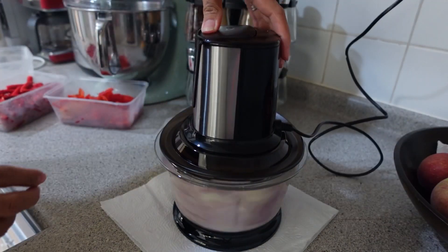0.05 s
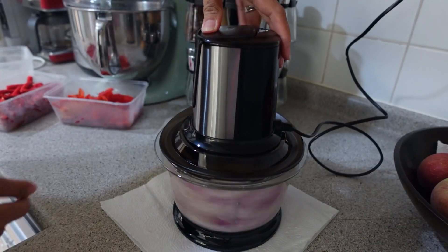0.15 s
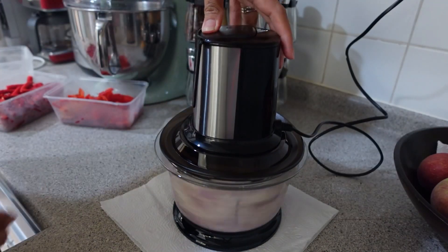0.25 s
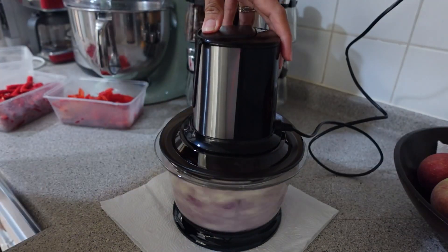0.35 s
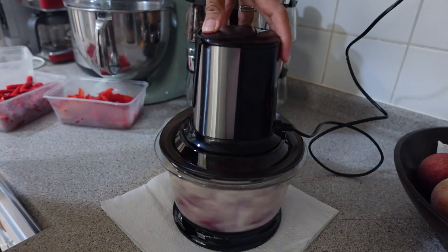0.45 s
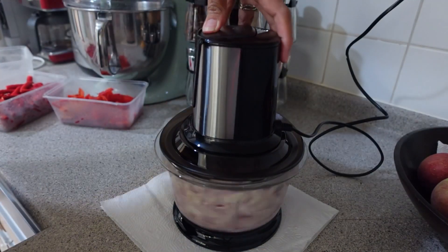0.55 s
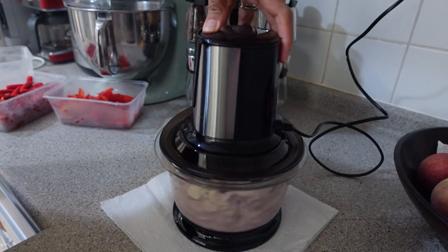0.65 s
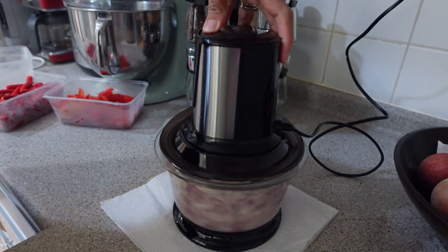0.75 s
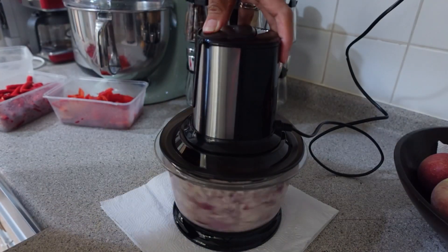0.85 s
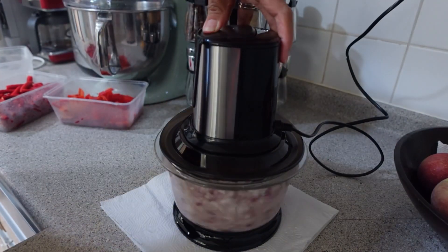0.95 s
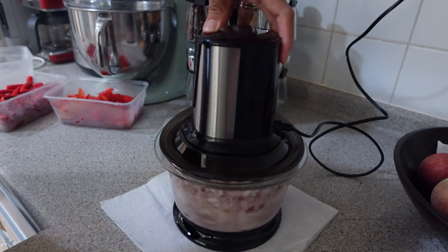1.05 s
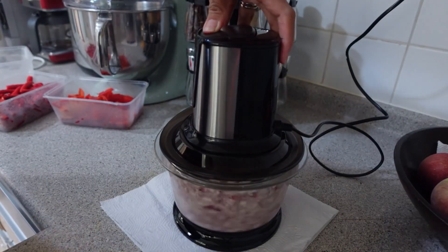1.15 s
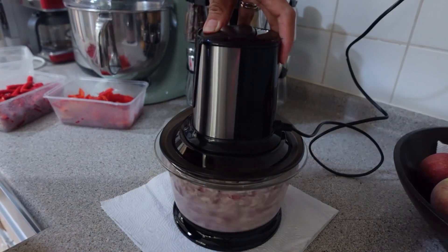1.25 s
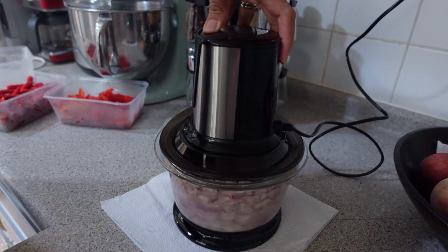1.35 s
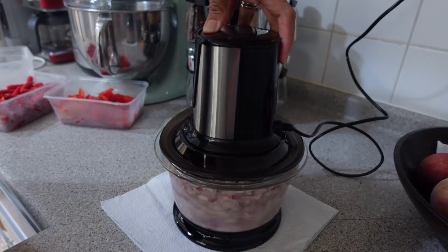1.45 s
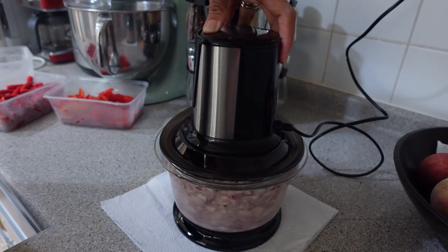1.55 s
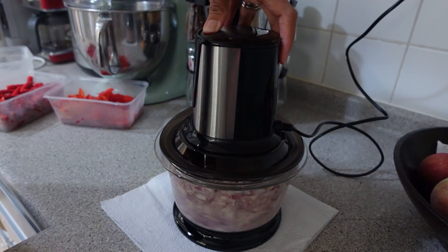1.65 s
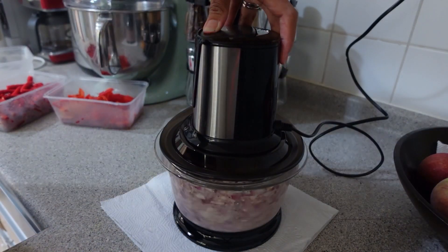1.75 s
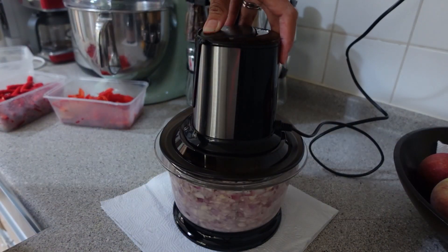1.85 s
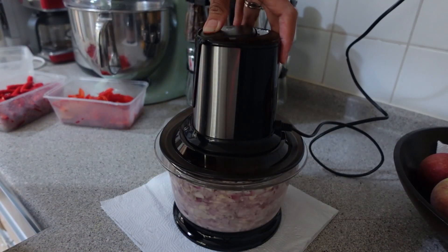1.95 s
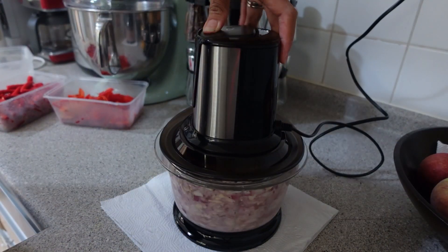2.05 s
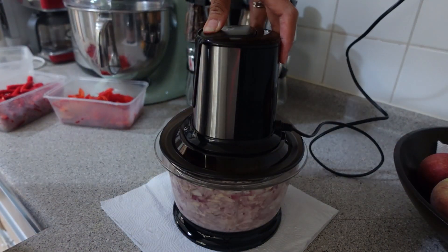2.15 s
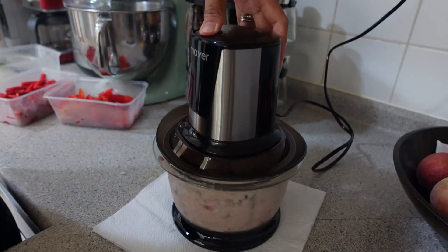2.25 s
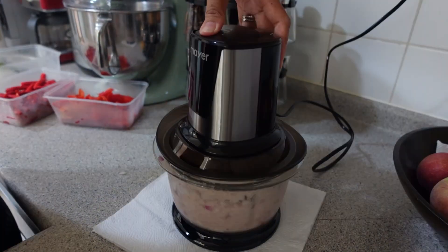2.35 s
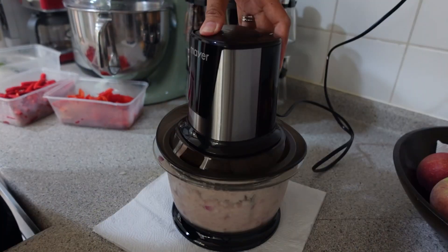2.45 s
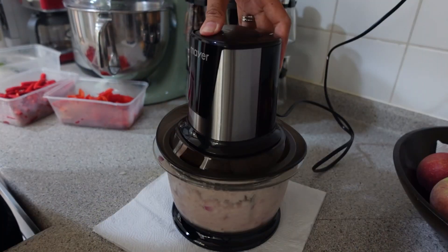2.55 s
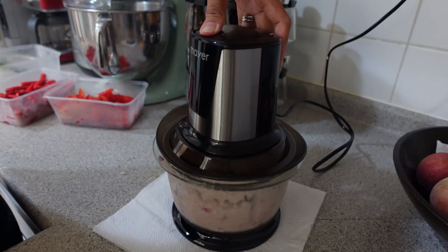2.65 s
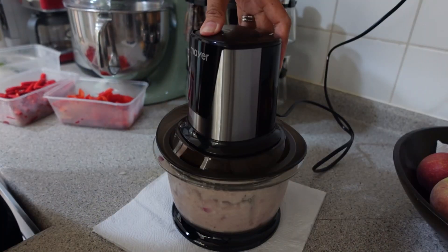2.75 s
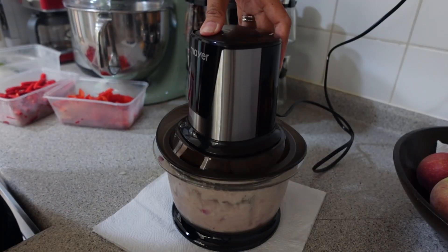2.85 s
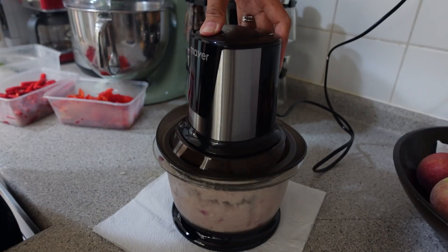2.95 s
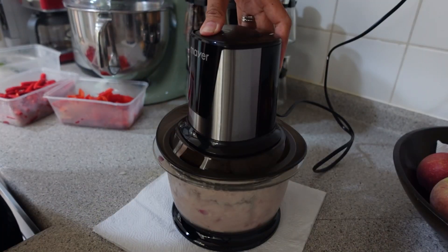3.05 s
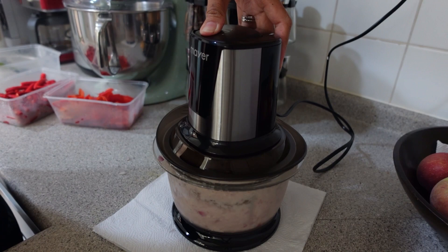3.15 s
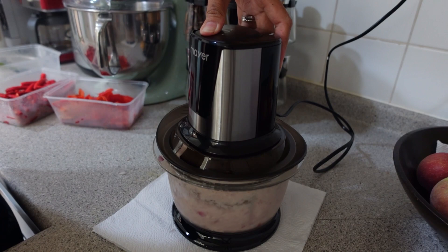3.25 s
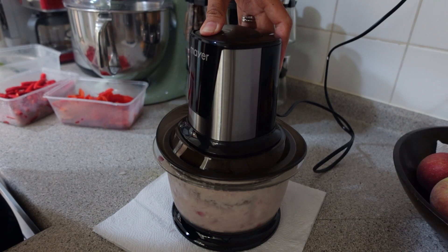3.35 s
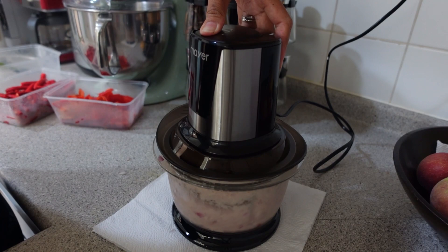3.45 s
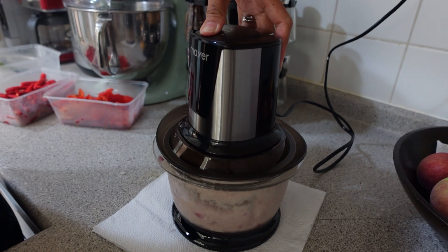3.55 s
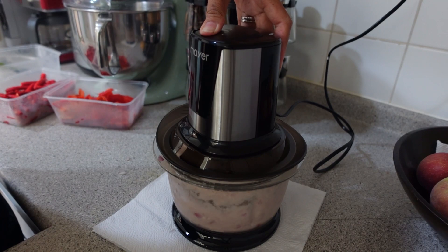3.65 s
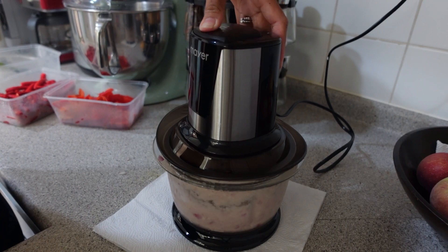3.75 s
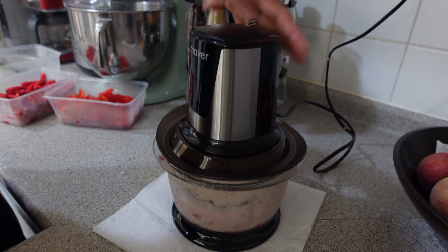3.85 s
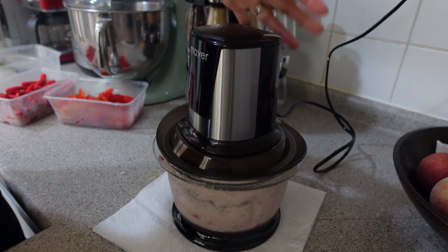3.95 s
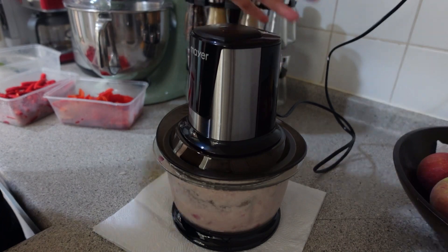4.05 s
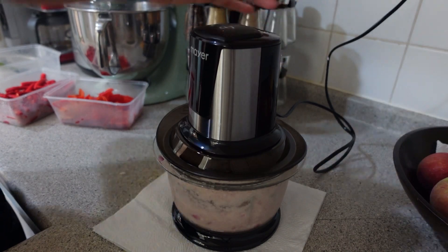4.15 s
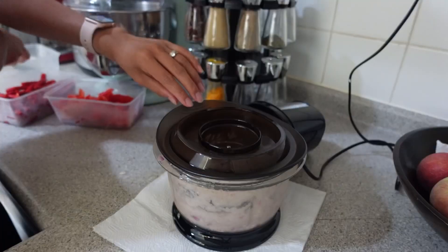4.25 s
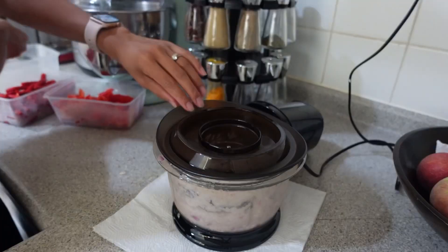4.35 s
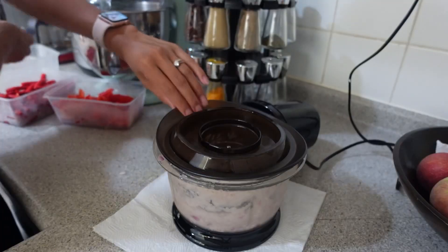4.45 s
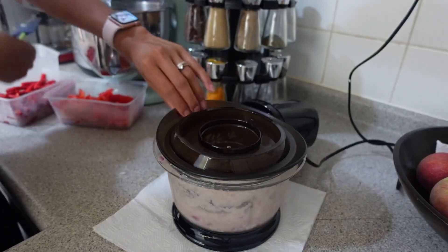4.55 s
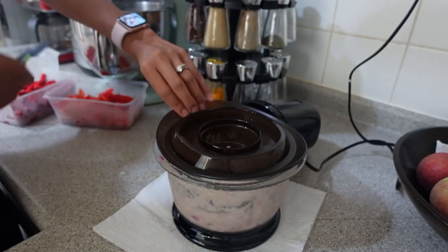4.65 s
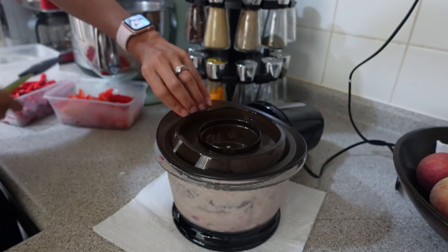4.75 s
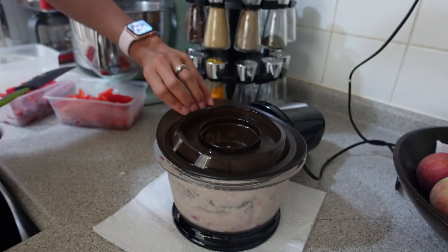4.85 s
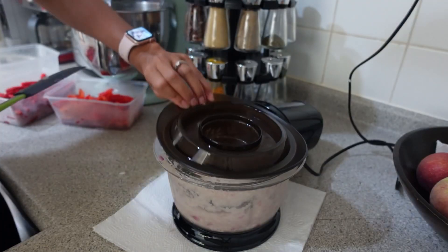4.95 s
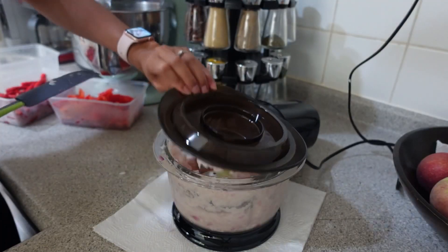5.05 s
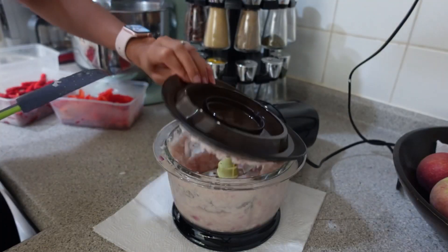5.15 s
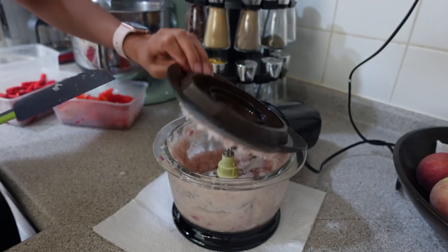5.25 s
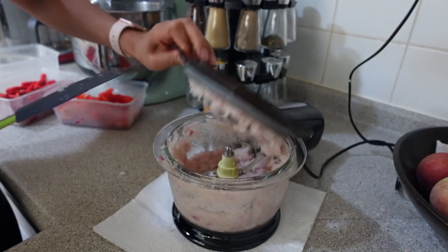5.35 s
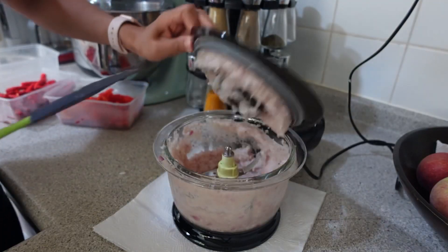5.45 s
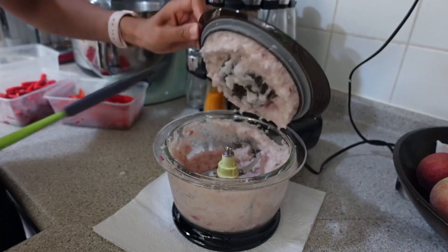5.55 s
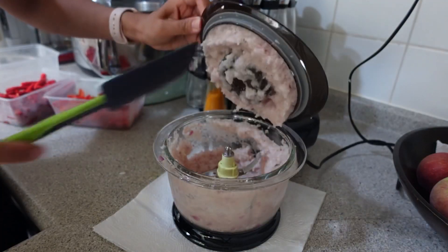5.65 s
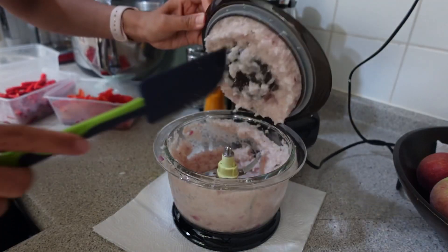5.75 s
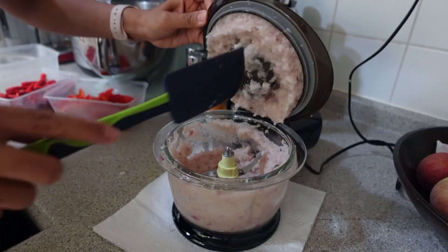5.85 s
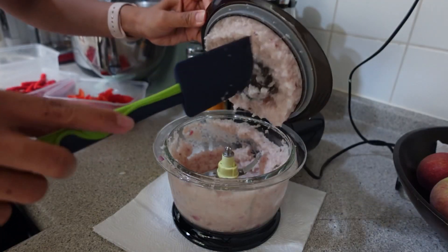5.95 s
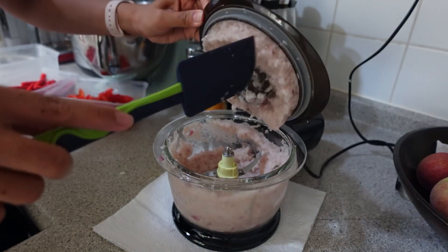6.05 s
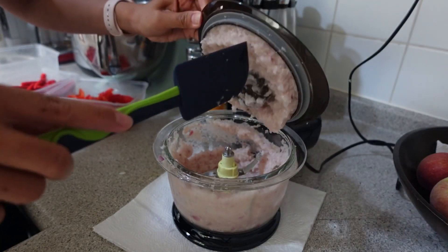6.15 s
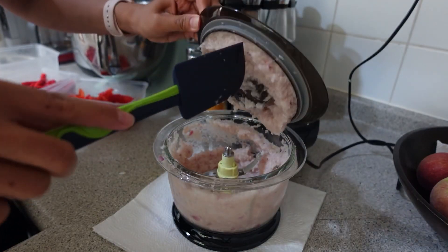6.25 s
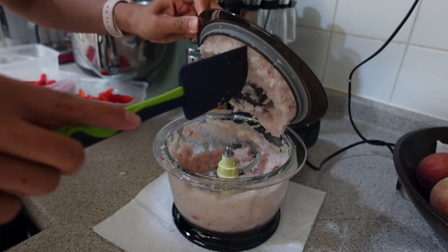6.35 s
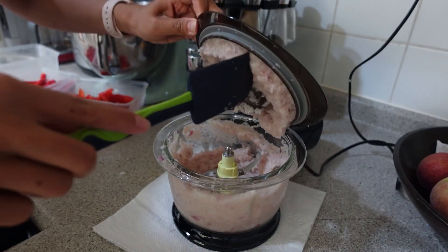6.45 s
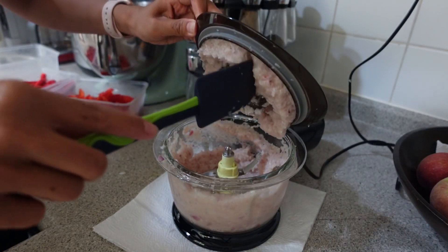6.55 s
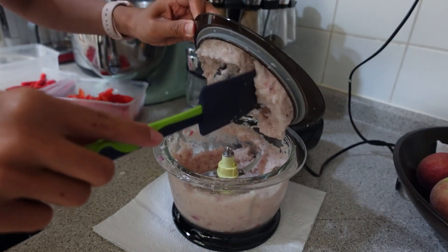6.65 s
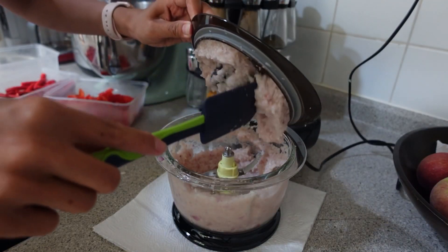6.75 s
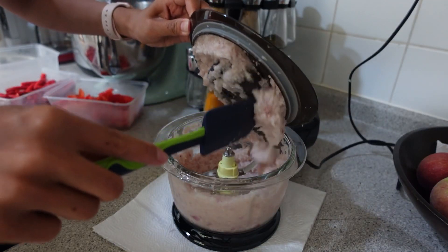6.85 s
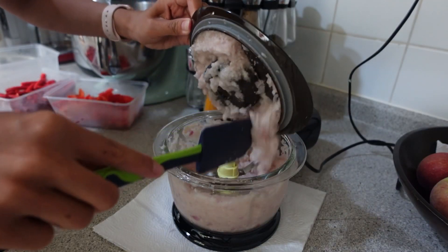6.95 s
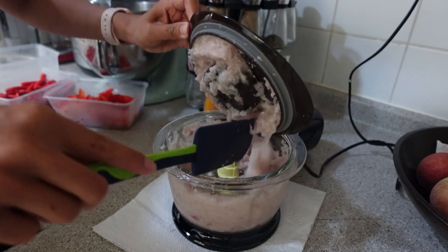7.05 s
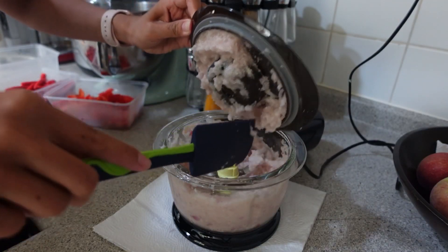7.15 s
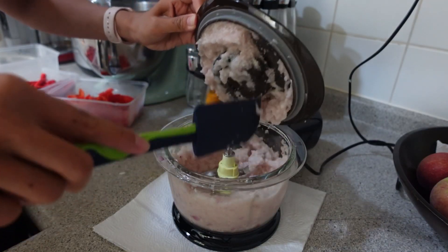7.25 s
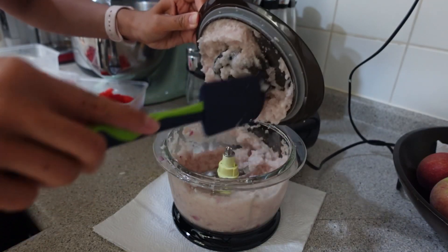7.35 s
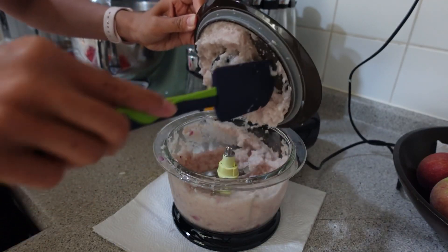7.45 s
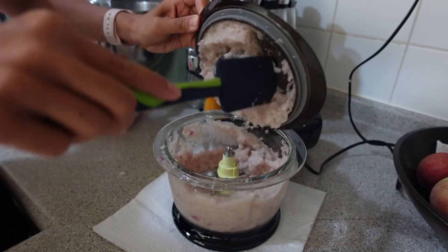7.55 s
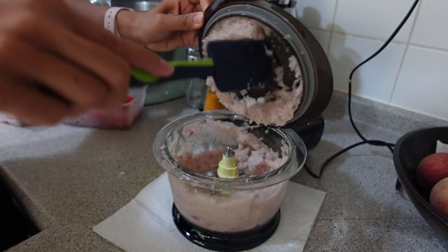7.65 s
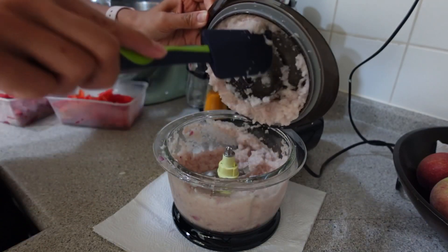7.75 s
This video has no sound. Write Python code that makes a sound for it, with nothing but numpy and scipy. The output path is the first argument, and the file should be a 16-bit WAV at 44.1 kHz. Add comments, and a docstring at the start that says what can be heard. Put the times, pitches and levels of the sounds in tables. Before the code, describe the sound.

A mini food chopper roars and churns, then stops, followed by light plastic lid and spatula knocks in a quiet kitchen.

```python
"""Mini chopper grinding onions

Blades roar in a glass bowl, and the gear whine climbs as the pieces shrink and the load falls.
After a brief dip in level the chopper churns pulp, then coasts down. After a second dip the
plastic lid is lifted and scraped with a spatula, each knock exciting its damped modes.
Behind it lie kitchen room tone and a high shrill band, likely insects outside."""
import sys
import numpy as np
from scipy import signal
from scipy.io import wavfile
from scipy.ndimage import uniform_filter1d

SR = 44100
rng = np.random.default_rng(int(sys.argv[2]) if len(sys.argv) > 2 else 0)


def digitize_waveform(pressure):
    """Quantize a signal to 16-bit integers and store it at the path in sys.argv[1].

    Rows of a 2-D input are taken as channels; values are limited to [-1, 1].
    """
    field = np.atleast_2d(pressure).T
    bounded = np.clip(field, -1, 1)
    quanta = np.round(bounded * 32767).astype(np.int16)
    wavfile.write(sys.argv[1], SR, quanta)


N = 343980
TIME = np.arange(N) / SR
CHURN_S, POWER_OFF_S, STOP_S = 2.2652, 3.73, 4.2315

# course of the roar: t/s, level/dB, rumble offset/dB, water and blade fizz offset/dB
ROAR_LEVELS = [(0, -12, -11, -12.5), (0.898, -13.5, -12.5, -10), (1.6, -13.5, -16.5, -8.5),
               (2.26, -13.5, -13, -5), (2.269, -12.5, -11.5, -4), (3.701, -12, -12, -4.5),
               (4, -12, -15, -4), (4.1, -16.5, -17.5, -3.5), (4.23, -21, -14, -7)]
# roar spectra for chopping, churning and coasting, each: f/Hz, density/dB
ROAR_SPECTRA = [
    [(35, -36.5), (90, -15.5), (190, -4), (260, -16), (400, -15), (700, -15.5), (920, -17), (1000, -11),
     (1350, -8), (1800, -10.5), (2250, -9), (2750, -15.5), (3500, -14.5), (6800, -23), (12400, -35),
     (15600, -37)],
    [(35, -32), (90, -20), (190, -5.5), (260, -16.5), (450, -15.5), (900, -3.5), (1000, -2.5), (1600, -2.5),
     (2250, -2), (2750, -5.5), (3400, -8.5), (5300, -5.5), (6400, -11.5), (8300, -13.5), (12000, -23.5),
     (15600, -26)],
    [(24, -68), (40, -49), (96, -4), (407, -11), (592, -9), (654, -10), (905, -10), (1650, -9.5),
     (2710, -11.5), (3000, -13.5), (4360, -1.5), (7360, -5), (15600, -22.5)],
]
# peaks and notches of housing, lid and bowl in those stages: f/Hz, width/Hz, gain/dB
CHOP_RESONANCES = [(600, 60, 4), (810, 60, 5), (1175, 50, 5), (1740, 50, -5), (1950, 90, 4), (2283, 90, 5),
                   (3700, 100, -3), (3973, 150, 5), (4600, 120, -4), (8398, 90, 8), (8700, 250, -4),
                   (9410, 150, 5), (10411, 130, 6), (11423, 100, 6)]
CHURN_RESONANCES = [(586, 30, 5), (1020, 80, 6), (1175, 50, 4), (1680, 50, 5), (1906, 45, 5),
                    (2200, 120, 4), (2750, 60, -5), (2955, 45, 13), (3125, 40, 7), (3240, 50, -5),
                    (3350, 45, 7), (3950, 130, 6), (4550, 60, -5), (5160, 80, 5), (5448, 55, 10),
                    (7000, 35, 10), (7397, 50, 7), (7763, 80, 6), (8301, 60, 9), (9173, 60, 4),
                    (9500, 120, 5), (10476, 80, 5), (10874, 90, 6), (11550, 100, 8)]
COAST_RESONANCES = [(592, 40, 10), (1163, 54, 7), (1475, 50, 9), (1626, 90, 12), (2050, 120, 7),
                    (3025, 120, 10), (3370, 84, 6), (3984, 150, 5), (4727, 110, 7), (5157, 54, 5),
                    (5652, 93, 6), (7203, 99, 5), (7763, 150, 6)]
# tooth-meeting rate, rising in steps as the load falls: t/s, f/Hz
MESH_RATE = [(0, 1170), (.18, 1305), (.42, 1320), (.55, 1372), (.78, 1388), (1, 1442), (1.28, 1515),
             (1.6, 1512), (1.76, 1582), (1.95, 1575), (2.08, 1640), (2.27, 1715)]
# mesh harmonics: multiple, rasp width/Hz, pure-tone share of power
MESH_HARMONICS = [(1, 26, .75), (2, 120, .18), (3, 220, 0), (4, 340, 0), (5, 330, 0), (6, 300, 0)]
# weight of each harmonic: level/dB
HARMONIC_DB = [-0.5, 0.5, -4, -4, -10, -12]
# sidebands one and two shaft rates below the mesh rate: level/dB
LOWER_SIDEBAND_DB = [-0.5, -14]
# radiation response of the housing: f/Hz, gain/dB
HOUSING_RESPONSE = [(1200, -3), (1400, 1), (1550, 0), (1700, 2), (2000, -3), (2600, -7), (2950, -3),
                    (3150, 1), (3400, -9), (3950, -4), (4500, -11), (4900, -3), (5270, 3), (5600, -2),
                    (6100, -2), (6600, -9), (7100, 5), (7600, 3), (8000, -7), (8400, -4), (9000, -14)]
# coasting shaft: multiple, width/Hz, pure-tone share, start t/s, peak t/s, end t/s, peak level/dB
SHAFT_TONES = [(1, 12, .7, 3.58, 3.96, 4.14, -26), (36, 200, 0, 3.69, 3.78, 4.02, -27)]
# tones of the mains buzz: f/Hz
BUZZ_HZ = [101, 195, 296, 371]
# course of the buzz: t/s, then level/dB for each tone
BUZZ_LEVELS = [(0, -32, -28.5, -31, -31.5), (1, -40, -36, -37, -39.5), (2.26, -35.5, -30, -50, -44.5),
               (2.28, -41, -32, -31, -49), (3.7, -52, -37.5, -35, -39), (3.85, -63, -66.5, -59, -64)]
# lid and spatula knocks: t/s, level/dB, hollow ring/dB, bright click/dB, pitch factor
LID_KNOCKS = [(4.24, -21.5, 4, -13, .97), (4.248, -22.5, 3.5, -21, 0.97), (4.344, -27, -6, -14, 1),
              (4.387, -25, -13, -18, 1.03), (4.42, -31, -16, -21, 1.2), (4.45, -28, -14, -23, 1.18),
              (4.855, -40, -17, -11, 1.5), (5.189, -27.5, -13.5, -14.5, 1.2),
              (5.626, -48, -16, -13.5, 0.96), (6.583, -40, -31, -12, 1.2), (6.945, -42, -4, -13, 0.93),
              (6.972, -32, -5, -9, 1.1), (7.124, -41, -16, -10, 1.0), (7.153, -36, -23, -10, 1.2),
              (7.425, -40, -7, -8, 0.97), (7.5661, -19.5, -14.5, -23, 1.04), (7.572, -19, -14, -29, 1.0),
              (7.658, -35, -8, -13, 1.24)]
# modes of the plastic lid: f/Hz, level/dB, T60/s
LID_MODES = [(290, -3, .08), (430, -3, .09), (570, 2, .13), (770, -5, .07), (980, 1, .09), (1293, 1, .09),
             (1626, -3.5, .06), (2790, -1.5, .04), (3220, -4, .036)]
# bowl and blades coming to rest: f/Hz, density/dB
SETTLING_SPECTRUM = [(24, -45), (40, -24), (96, -1.5), (419, -12), (561, -16), (664, -15), (948, -9),
                     (1300, -20), (1670, -8.5), (2190, -16), (6000, -27), (7800, -54.5), (13200, -120)]
# sliding wet pulp: f/Hz, density/dB
PULP_SPECTRUM = [(180, -39), (300, -4.5), (541, 1), (904, -12.5), (1320, -3), (1780, -18), (3370, -8),
                 (5100, -25), (6000, -22.5), (7800, -47), (13200, -120)]
# low bumps through the counter: peak t/s, level/dB
COUNTER_BUMPS = [(4.83, -47), (6.975, -38.5), (7.58, -47.5)]
# quiet kitchen with its shrill band: f/Hz, density/dB
ROOM_SPECTRUM = [(30, -20), (120, -8.5), (284, -11), (500, -17.5), (1110, -17.5), (2630, -27.5),
                 (5700, -33), (6100, -15.5), (7000, -11), (8300, -9), (9300, -16.5), (10600, -30.5),
                 (12300, -37), (15600, -41)]
# peaks in the shrill band: f/Hz, width/Hz, gain/dB
SHRILL_PEAKS = [(6075, 40, 6), (6514, 20, 9), (6944, 60, 7), (7032, 25, 15), (7261, 30, 6), (7378, 30, 5),
                (7915, 55, 11), (8125, 22, 9), (8234, 45, 6), (8758, 40, 7), (9203, 45, 9), (9432, 35, 6),
                (10070, 45, 7), (10939, 60, 5)]
# likeness of left and right, for the room and for near sources: f/Hz, coherence
ROOM_COHERENCE = [(100, .77), (1000, .68), (4000, .82), (8000, 1), (12000, .999)]
NEAR_COHERENCE = [(60, .995), (200, .992), (400, .965), (800, .965), (1500, .975), (3000, .972),
                  (6000, .972), (9000, .993), (12000, .9998)]
# stereo balance of the noises: f/Hz, left above right/dB
BALANCE = [(60, 1.2), (150, 1.1), (300, .4), (600, -.7), (1200, -1), (2400, -1.8), (5000, -.9), (9000, -.3),
           (12000, 0)]
# brief dips in level: t/s, wait/s, recovery/s, lowest gain
LEVEL_DIPS = [(2.2652, .001, .02, .1), (4.2315, .007, .008, .3)]


def blade_roar():
    """Source and filter: blades, pieces and water make broad noise that housing, lid and bowl colour."""
    times, *columns = np.transpose(ROAR_LEVELS)
    level_db, rumble_db, fizz_db = (np.interp(TIME, times, c) for c in columns)
    resonances = CHOP_RESONANCES, CHURN_RESONANCES, COAST_RESONANCES
    stages = [noise(spectrum, 0, STOP_S, peaks) for spectrum, peaks in zip(ROAR_SPECTRA, resonances)]
    coasting = np.clip((TIME - POWER_OFF_S) / .08, 0, 1)
    stop, roar = round(STOP_S * SR), 0
    for lo_hz, hi_hz, offset_db, flicker_db in (
            (30, 512, rumble_db, 1.5), (920, 2845, -.24, .38), (4190, 13700, fizz_db - .5, .87)):
        chop, churn, coast = (placed(unit_rms(band(x[:, :stop], lo_hz, hi_hz)), 0) for x in stages)
        later = np.sqrt(1 - coasting) * churn + np.sqrt(coasting) * coast
        gain = gain_of(level_db + offset_db) * flicker(61, flicker_db)  # pieces hit the blades
        roar = roar + np.where(TIME < CHURN_S, chop, later) * gain
    treble = roar - band(roar, 5, 8000)  # dies first as the blades slow
    dulling_db = 17.5 * np.maximum(TIME - POWER_OFF_S, 0)
    return roar - treble * (1 - gain_of(-dulling_db))


def gear_whine(teeth=11, base_db=-24):
    """Phase modulation: uneven teeth and load shake the mesh harmonics; the shaft adds sidebands."""
    shake = .1 * drift(25)
    mesh_hz = np.interp(TIME, *np.transpose(MESH_RATE)) * (1 + .005 * drift(9))  # the load tugs
    whine = 0
    for (k, width, purity), db in zip(MESH_HARMONICS, HARMONIC_DB):
        whine += rough_tone(k * mesh_hz, width, purity, k * shake) * gain_of(db) * radiation(k * mesh_hz)
    for k, db in enumerate(LOWER_SIDEBAND_DB, 1):
        side_hz = mesh_hz * (1 - k / teeth)
        whine += rough_tone(side_hz, 34, .5, shake) * gain_of(db) * radiation(side_hz)
    clearing = np.clip(TIME / .2, .3, 1)  # the tones come clear of the first heavy chunks
    surge_db = 14 * np.clip(TIME - 1.95, 0, 1)  # the blades run free
    return whine * (TIME < CHURN_S) * clearing * gain_of(base_db + surge_db) * flicker(14, 1)


def radiation(hz, lid_hz=1400, width_hz=140, lid_db=5.4):
    """Frequency response: the housing weights each gear tone, and a lid resonance lifts those near it."""
    return gain_of(spectrum_at(HOUSING_RESPONSE, hz) + lid_db / (1 + (2 * (hz - lid_hz) / width_hz) ** 2))


def coasting_shaft(full_hz=143, end_hz=93, time_constant_s=.13):
    """Exponential relaxation: with the power off, the shaft slows and its harmonics glide down."""
    shaft_hz = end_hz + (full_hz - end_hz) * np.exp(-np.maximum(TIME - POWER_OFF_S, 0) / time_constant_s)
    shake, tones = .1 * drift(25), 0
    for k, width, purity, *times, peak_db in SHAFT_TONES:
        swell_db = np.interp(TIME, times, [peak_db - 12, peak_db, peak_db - 12], -120, -120)
        tones += rough_tone(k * shaft_hz, width, purity, shake) * gain_of(swell_db)
    return tones


def mains_buzz():
    """Forced vibration: the motor drives low, wavering tones into the counter."""
    times, *levels_db = np.transpose(BUZZ_LEVELS)
    buzz = sum(rough_tone(hz, 20, .2, .25 * drift(8)) * gain_of(np.interp(TIME, times, db))
               for hz, db in zip(BUZZ_HZ, levels_db))
    return buzz * (TIME < times[-1]) * gain_of([[.5], [-.5]])


def lid_knocks():
    """Impact excitation: each crack rings the lid's modes, low or high by how it is struck."""
    knocks, t = np.zeros(N + SR), np.arange(SR // 4) / SR
    for s, db, hollow_db, bright_db, pitch in LID_KNOCKS:
        tilt = [(900, hollow_db), (2000, -.54), (3500, bright_db)]
        ring = sum(gain_of(mode_db + spectrum_at(tilt, hz) - 60 * t / t60)
                   * np.sin(2 * np.pi * (hz * pitch * t + rng.random())) for hz, mode_db, t60 in LID_MODES)
        top_hz = np.interp(bright_db, [-20, -15], [3600, 5800])  # dull knocks lose the top
        crack = unit_rms(band(rng.standard_normal(len(t)), 1300, top_hz))
        crack *= gain_of(bright_db + 7.5 - 60 * t / .055)
        start, attack = round(s * SR), np.minimum(t / .00023, 1)
        knocks[start:start + len(t)] += gain_of(db - 7.5) * (ring + crack) * attack
    return knocks[:N]


def settling():
    """Damping: the noise of bowl and blades dies away as they come to rest."""
    rattle = noise(SETTLING_SPECTRUM, STOP_S, STOP_S + 1)
    return rattle * decay(4.243, -36, t60=1.1, rise_s=.04) * flicker(60, 1.2)


def sliding_pulp(peak_s=6.968, rise_s=.075, t60=.16):
    """Amplitude-modulated noise: wet pulp slides off the lid in a short, fluttering burst."""
    squelch = noise(PULP_SPECTRUM, peak_s - rise_s, peak_s + t60, patchy_db=3)
    return squelch * decay(peak_s, -39, t60, rise_s) * flicker(150, 2.3)


def bowl_ring():
    """Free vibration: one mode of the glass bowl rings as pulp drops in."""
    return rough_tone(hz=558, width_hz=25, purity=.6) * decay(6.99, -47, t60=.55, rise_s=.02)


def counter_bumps():
    """Structure-borne sound: bumps pass through the counter as decaying low noise."""
    rumble = unit_rms(band(rng.standard_normal(N), 51, 186))
    return rumble * sum(decay(s, db, t60=.57, rise_s=.07) for s, db in COUNTER_BUMPS)


def reverberate(x, t60=.86, wet_db=-8.5):
    """Reverberation: dense room reflections follow the direct sound as an exponential tail."""
    t = np.arange(SR // 3) / SR
    tails = rng.standard_normal((2, len(t))) * gain_of(-60 * t / t60) * (t > .004)
    wet = signal.oaconvolve(x[None], tails / np.linalg.norm(tails[0]), axes=1)[:, :N]
    return x + gain_of(wet_db) * wet


def room_tone():
    """Ambient noise: a low, broad floor and a shrill band with narrow peaks, likely insects."""
    air = noise(ROOM_SPECTRUM, 0, N / SR, SHRILL_PEAKS, coherence=ROOM_COHERENCE)
    return air * gain_of(-41) * flicker(28.5, .4)


def noise(spectrum, start_s, end_s, peaks=(), patchy_db=1.5, coherence=NEAR_COHERENCE):
    """Spectral shaping: stereo noise with resonances and drifting patches, rms 1 between two times."""
    frame, hop = 2048, 512
    hz, start = np.fft.rfftfreq(frame, 1 / SR), round(start_s * SR)
    length = min(round(end_s * SR), N) - start
    a, b, c, d, patches = rng.standard_normal((length // hop + 5, len(hz), 5)).T
    patches = unit_rms(uniform_filter1d(uniform_filter1d(patches, 4, axis=0), 12, axis=1))
    shape = gain_of(spectrum_at(spectrum, hz))
    for f, width, db in peaks:
        shape *= np.sqrt(1 + (gain_of(db) ** 2 - 1) / (1 + (2 * (hz - f) / width) ** 2))
    shared = spectrum_at(coherence, hz)[:, None]
    left = a + 1j * b
    right = shared * left + np.sqrt(1 - shared ** 2) * (c + 1j * d)
    balance = gain_of(np.outer([.5, -.5], spectrum_at(BALANCE, hz)))
    bins = np.array([left, right]) * (balance * shape)[:, :, None] * gain_of(patchy_db * patches)
    wave = signal.istft(bins, nperseg=frame, noverlap=frame - hop)[1]
    return placed(unit_rms(wave[:, :length]), start)


def rough_tone(hz, width_hz, purity, shake_turns=0):
    """Heterodyning: noise shifted to 0 Hz, smoothed and shifted back forms a rasp around a tone."""
    phase = 2 * np.pi * np.cumsum(hz * np.ones(N)) / SR
    tone = np.sqrt(2) * np.cos(phase + 2 * np.pi * shake_turns)
    carrier, pole = np.exp(1j * phase), np.exp(-np.pi * width_hz / SR)
    baseband = signal.lfilter([1], [1, -2 * pole, pole ** 2], rng.standard_normal(N) / carrier)
    return np.sqrt(purity) * tone + np.sqrt(1 - purity) * unit_rms((carrier * baseband).real)


def decay(peak_s, level_db, t60, rise_s):
    """Exponential decay: a gain that rises until peak_s, then loses 60 dB every t60 seconds."""
    t = TIME - peak_s
    return np.clip(1 + t / rise_s, 0, 1) ** 2 * gain_of(level_db - 60 * np.maximum(t, 0) / t60)


def drift(per_s):
    """Low-pass noise of rms 1 that changes about per_s times a second."""
    size = int(SR / per_s)
    return unit_rms(uniform_filter1d(uniform_filter1d(rng.standard_normal(N), size), size))


def flicker(per_s, depth_db):
    """Random amplitude modulation, as a gain."""
    return gain_of(depth_db * drift(per_s))


def band(x, lo_hz, hi_hz):
    """Band-pass filtering."""
    return signal.sosfilt(signal.butter(2, [lo_hz, hi_hz], "band", fs=SR, output="sos"), x)


def spectrum_at(points, hz):
    """Interpolation on a log-frequency axis."""
    f, value = np.transpose(points)
    return np.interp(np.log(hz + 1), np.log(f + 1), value)


def placed(x, start):
    """Delay by start samples, with silence up to N."""
    return np.pad(x, ((0, 0), (start, N - start - x.shape[1])))


def gain_of(db):
    """Amplitude ratio from decibels."""
    return 10 ** (np.asarray(db) / 20)


def unit_rms(x):
    """Normalisation to rms 1."""
    return x / np.sqrt(np.mean(x ** 2) + 1e-20)


def scene():
    """Superposition: all sources add, and the level of the sum dips briefly twice."""
    chopper = blade_roar() + (gear_whine() + coasting_shaft()) * gain_of([[-.6], [.6]]) + mains_buzz()
    handling = reverberate(lid_knocks()) + settling() + sliding_pulp() + bowl_ring() + counter_bumps()
    mix = chopper + handling + room_tone()
    for s, wait_s, recovery_s, floor in LEVEL_DIPS:
        mix *= np.where(TIME < s, 1, np.clip((TIME - s - wait_s) / recovery_s, floor, 1))
    return mix


def record(dry):
    """Band limiting and saturation: the microphone drops deep bass, softens peaks and cuts the top."""
    thinned = signal.sosfilt(signal.butter(2, 42, "high", fs=SR, output="sos"), dry)
    squeezed = 1.3 * np.tanh(thinned / 1.3)
    low_pass = signal.firwin(511, 15700, window=("kaiser", 9), fs=SR)
    return signal.oaconvolve(squeezed, low_pass[None], "same")


dry = scene()
out = record(dry)
digitize_waveform(out)
```